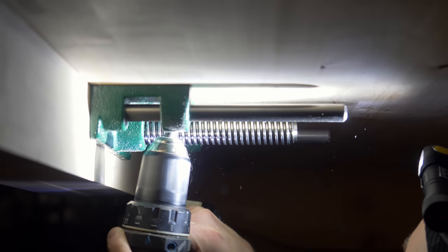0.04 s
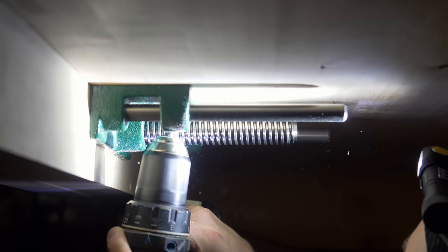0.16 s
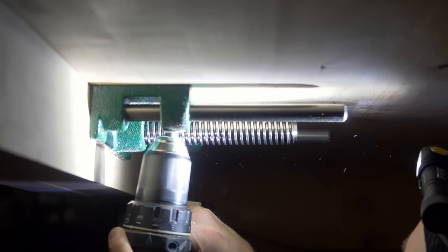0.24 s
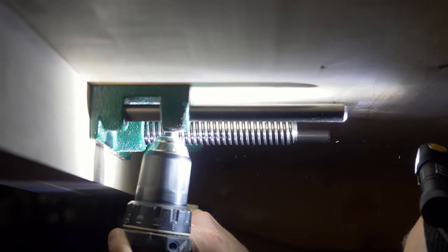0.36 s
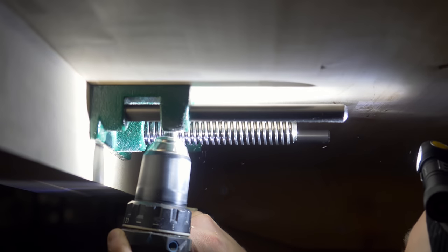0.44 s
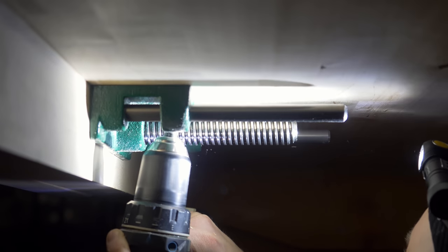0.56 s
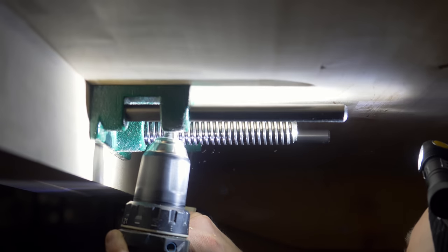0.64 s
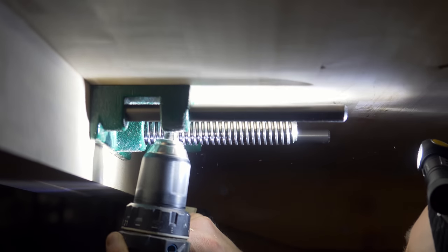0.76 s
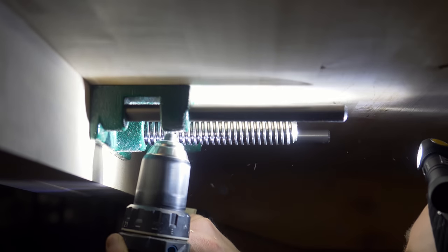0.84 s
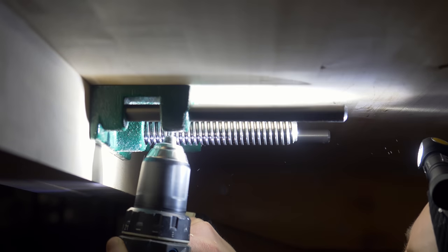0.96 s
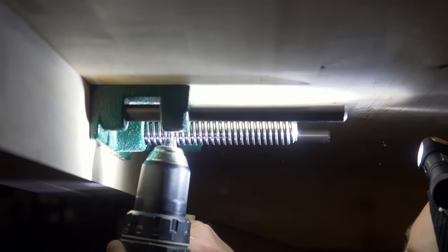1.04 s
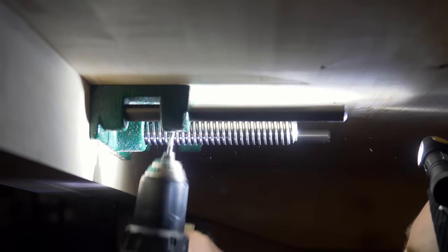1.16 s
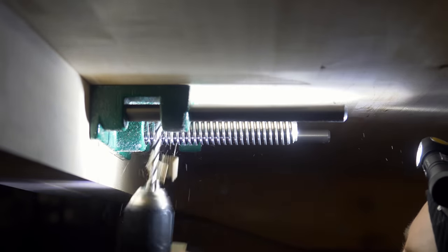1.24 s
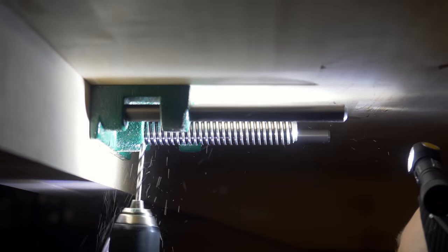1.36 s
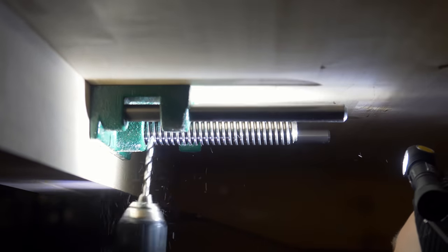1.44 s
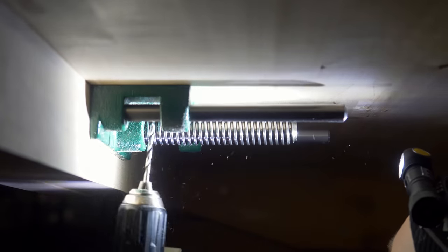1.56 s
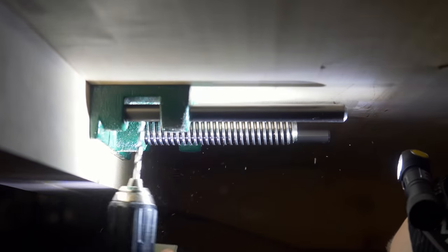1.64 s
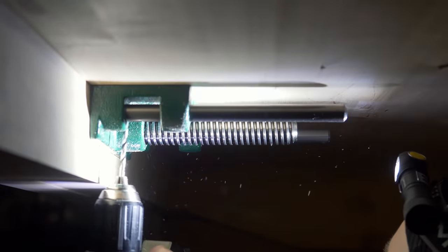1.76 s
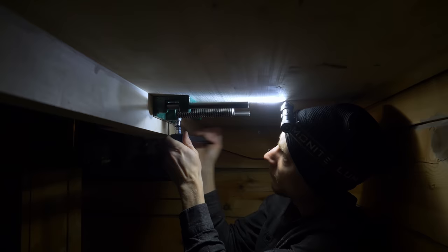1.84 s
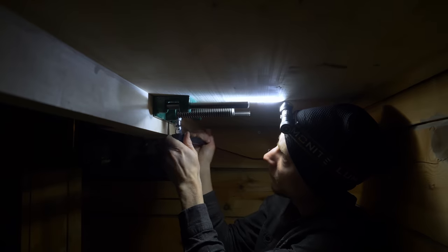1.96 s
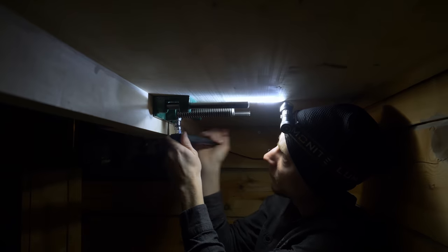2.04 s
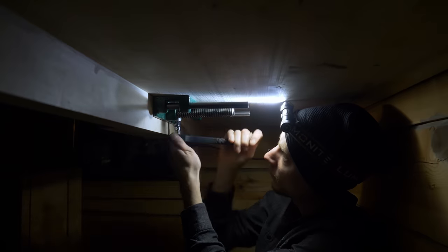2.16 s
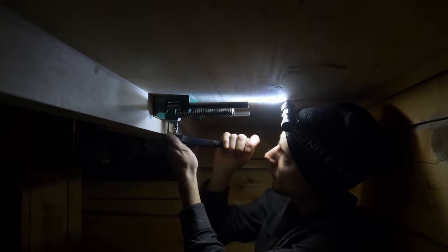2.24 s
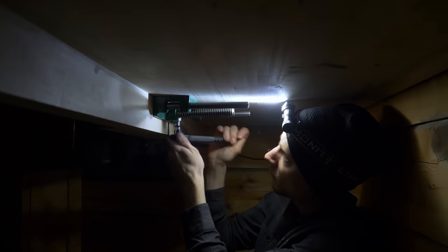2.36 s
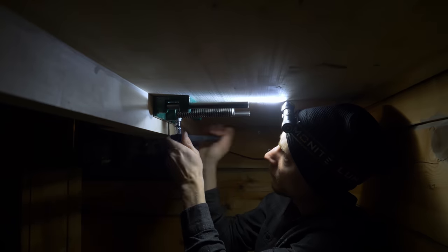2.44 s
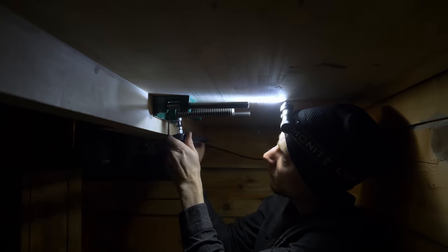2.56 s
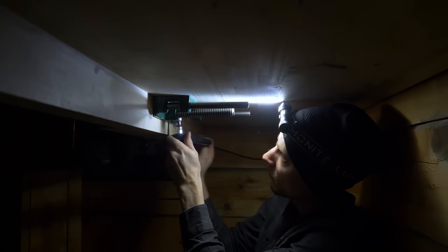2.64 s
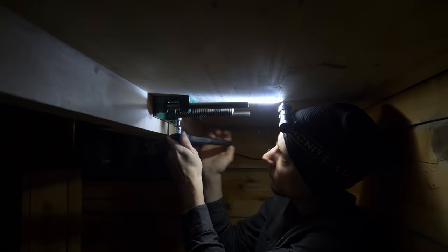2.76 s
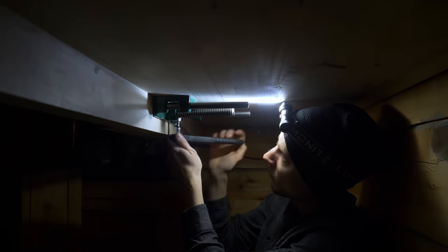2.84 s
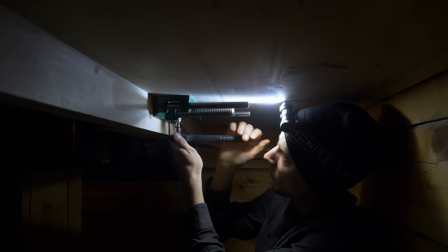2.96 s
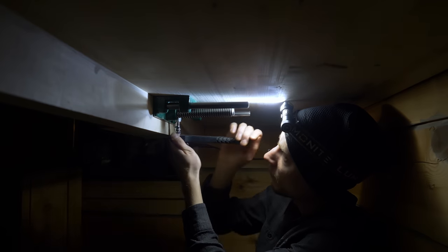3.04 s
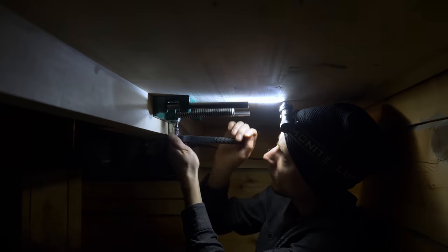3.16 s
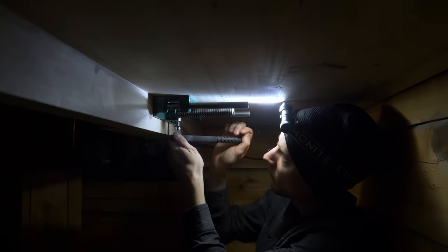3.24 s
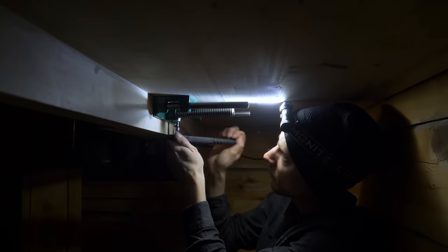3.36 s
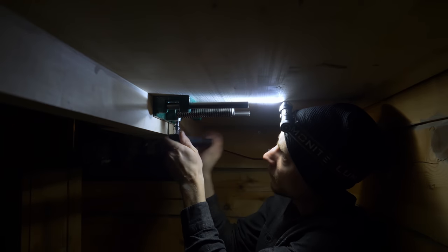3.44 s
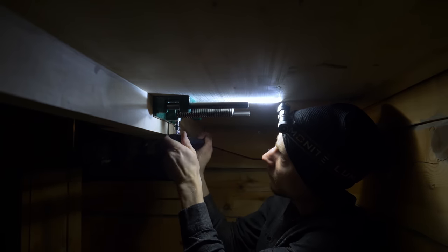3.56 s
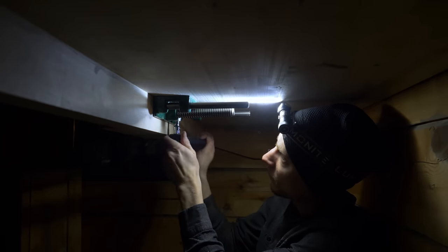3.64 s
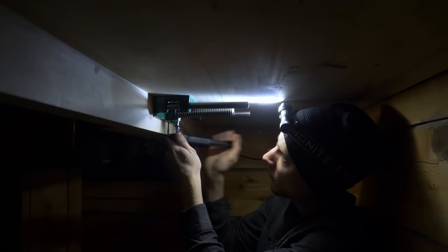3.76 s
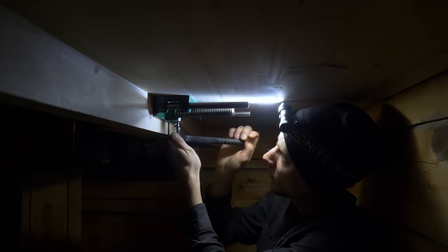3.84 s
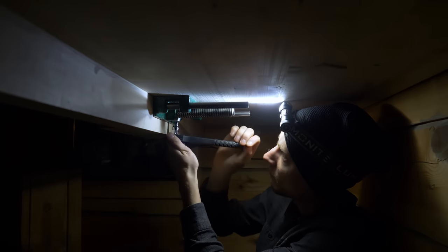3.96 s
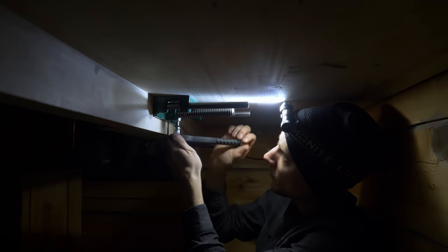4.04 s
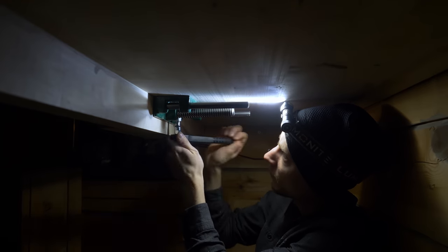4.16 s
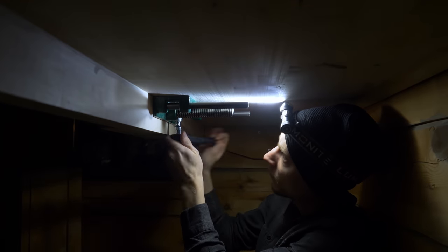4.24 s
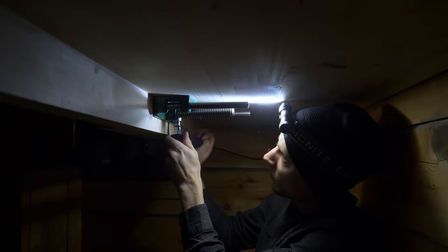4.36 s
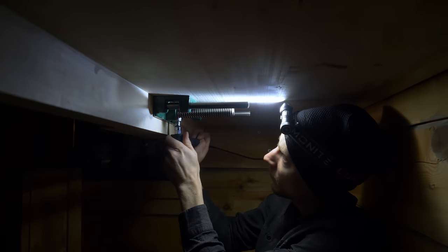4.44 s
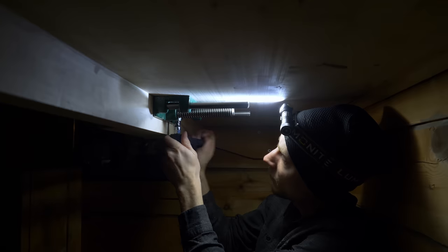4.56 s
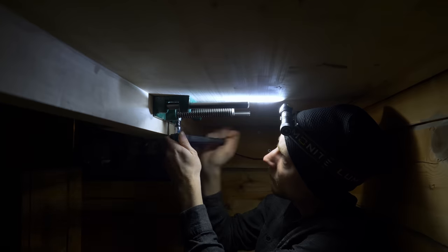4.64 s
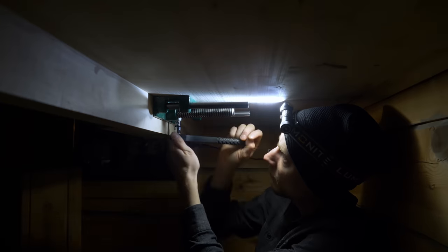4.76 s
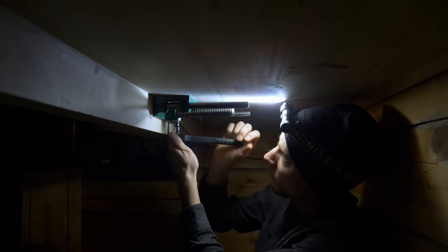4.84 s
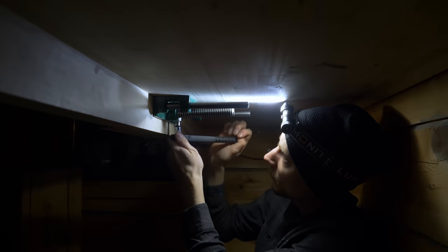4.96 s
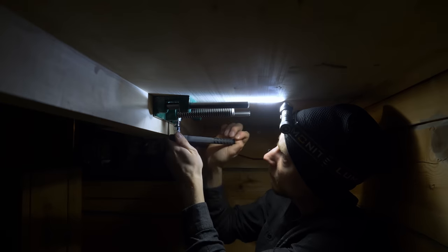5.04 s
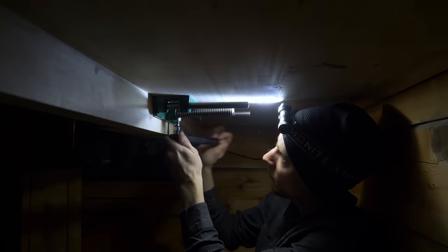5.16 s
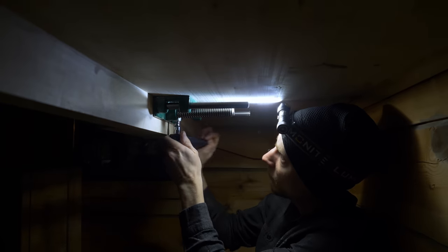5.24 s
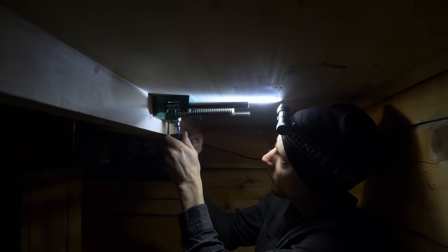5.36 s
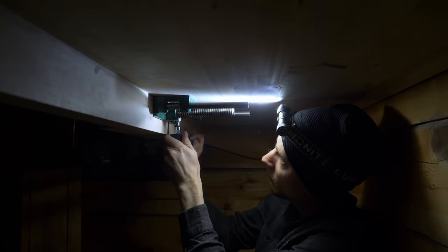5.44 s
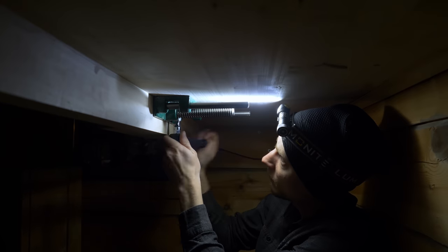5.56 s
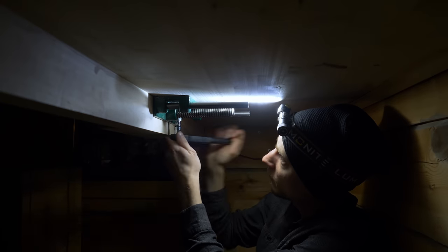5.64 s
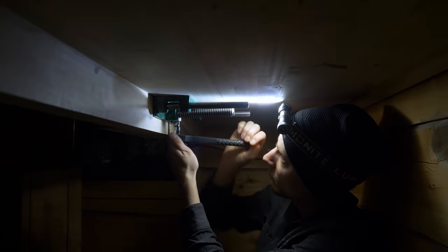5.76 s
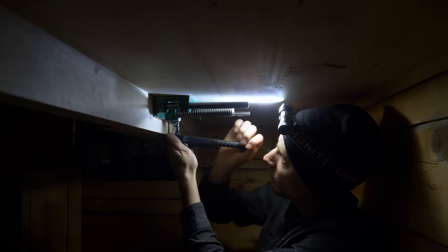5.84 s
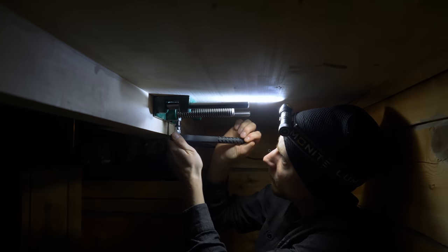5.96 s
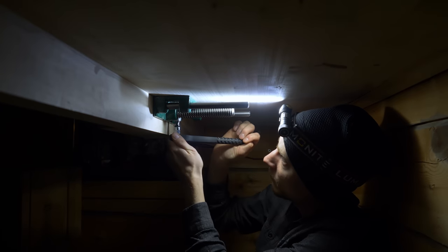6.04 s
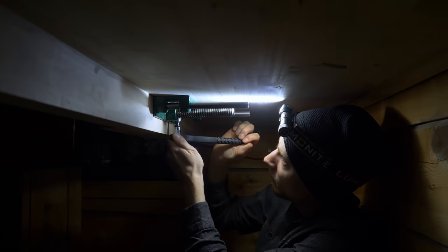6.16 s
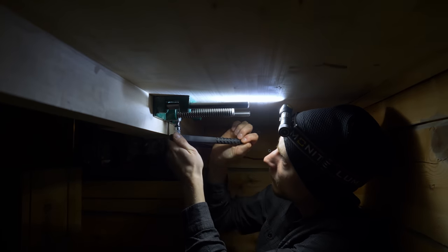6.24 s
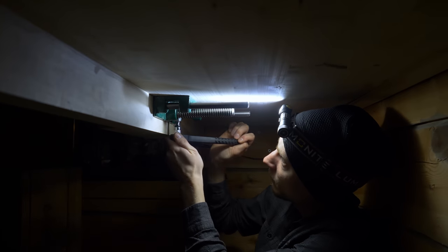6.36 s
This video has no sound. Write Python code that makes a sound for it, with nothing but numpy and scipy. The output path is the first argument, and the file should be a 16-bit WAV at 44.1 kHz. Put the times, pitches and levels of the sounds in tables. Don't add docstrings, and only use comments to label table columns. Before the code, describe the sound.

A drill motor whines under load, lifts to a freer, higher whine and cuts off sharply, its chuck ticking. After near quiet, hand and wrench bump a wooden bench; five back strokes each give six or seven crisp steel clicks, slowing towards the end. Knocks, low thuds and faint creaking fill the gaps. Heard close in stereo, in a small wooden workshop with a short reverberation and low room tone.

```python
import sys
import numpy as np
from scipy import signal
from scipy.fft import rfft, irfft
from scipy.io import wavfile
from scipy.ndimage import uniform_filter1d

SR = 44100
rng = np.random.default_rng(int(sys.argv[2]) if len(sys.argv) > 2 else 0)


def gain_from_db(level_db):
    decades = np.asarray(level_db, float) / 20
    return 10 ** decades


def put_to_file(sound):
    columns = np.atleast_2d(sound).T
    safe = np.clip(columns, -1, 1)
    whole_steps = np.round(safe * 32767)
    wavfile.write(sys.argv[1], SR, whole_steps.astype(np.int16))


N = 282240
TIME = np.arange(N) / SR
CHANGE_S = 1.88


def evened(x):
    return x / np.sqrt(np.mean(x ** 2) + 1e-20)


def peaked(x):
    return x / np.abs(x).max()


def read(points, hz):
    f, value = np.transpose(points)
    return np.interp(np.log(hz + 1), np.log(f + 1), value)


def add(mix, start_s, sound):
    part = mix[round(start_s * SR):][:len(sound)]
    part += sound[:len(part)]


def coloured(x, points):
    size = x.shape[-1]
    return evened(irfft(rfft(x) * gain_from_db(read(points, np.fft.rfftfreq(size, 1 / SR))), size))


def above(x, hz):
    return signal.sosfilt(signal.butter(4, hz, "high", fs=SR, output="sos"), x)


def drift(seconds):
    width = max(int(seconds * SR), 2)
    return evened(uniform_filter1d(uniform_filter1d(rng.standard_normal(N), width), width))


def somewhere(low_hz, high_hz):
    return low_hz * (high_hz / low_hz) ** rng.random()


def grit(spread_db, per_s):
    size = gain_from_db(spread_db * np.minimum(rng.exponential(1, N), 4))
    return rng.standard_normal(N) * size * (rng.random(N) < per_s / SR)


def rung(force, modes, weight_db=0):
    pitch_hz, level_db, t60_s = np.transpose(modes)
    t = np.arange(min(SR // 4, int(SR * t60_s.max())))[:, None] / SR
    decay = gain_from_db(level_db + weight_db - 60 * t / t60_s)
    ring = (decay * np.sin(2 * np.pi * pitch_hz * t)).sum(1)
    return evened(np.pad(signal.oaconvolve(force, ring), (0, SR // 4 - len(t))))


# pitch_hz, level_db
BAND_EDGE = [(15600, -75)]
# start_s, commutator pitch_hz
SPEED = [
    (0, 2562),
    (.3, 2568),
    (.7, 2608),
    (.8, 2690),
    (1.02, 2780),
    (1.06, 3030),
    (1.12, 3105),
    (1.2, 3170),
    (1.3, 3188),
]
# pitch_hz, level_db (per Hz)
CUTTING = [(53, -59.5), (90, -73), (241, -2.5), (293, -13.5), (500, 1), (569, -12), (704, -3), (2390, -7),
           (2660, -4), (3370, -2.5), (4950, -2), (6980, -9), (10500, -8.5), (15100, -26)]
# pitch_hz, level_db (per Hz)
FREE = [(53, -70.5), (90, -66), (195, -59), (312, -16.5), (412, -14), (972, -3), (2440, -6), (4850, -4),
        (5880, -6.5), (6270, -11), (6690, -7.5), (9840, -9.5), (15100, -24.5)]
WHIRR_DB = (-26, -27.5)
# pitch_hz, width_hz, level_db (re whirr)
HOUSING = [(1170.5, 24, -15), (1964, 72, -14.5), (3900, 130, -12.5), (4420, 78, -13), (4897, 90, -8)]
ORDERS = (1, 2, 4, 5, 11.255, 23, 40, 50)
ORDER_LOAD_HZ = (2580, 2640, 3150)
ORDER_DB = [(-46, -56, -44), (-44, -56, -47), (-52, -54, -45), (-54, -54, -47), (-42, -54, -47),
            (-42, -52, -40), (-43, -50, -62), (-58, -52, -90)]
PARTIAL_LOAD_HZ = (2565, 2588, 2740, 3050, 3170)
PARTIAL_DB = [
    (-56, -36, -38.5, -31, -39),
    (-39, -38, -34.5, -36, -32),
    (-46, -41, -47, -43, -42),
]
BARS = 10
LET_GO_S, SAG_HZ_PER_S = 1.43, 2600
GLIDE_LOSS_DB = 1.3


def drill():
    tone_hz = np.interp(TIME, *np.transpose(SPEED)) - SAG_HZ_PER_S * np.clip(TIME - LET_GO_S, 0, 1)
    top_hz = np.maximum.accumulate(tone_hz)
    free = np.clip((top_hz - 2780) / 280, 0, 1)
    turns = np.cumsum(tone_hz / BARS * (1 + 0.0008 * drift(0.0085))) / SR

    chatter = rng.standard_normal(N) + 0.27 * evened(grit(4.3, 2500))
    chatter *= gain_from_db(0.38 * drift(0.0033) + 0.68 * drift(0.027))
    in_wood = np.sqrt(1 - free) * coloured(chatter, CUTTING + BAND_EDGE)
    whirr = evened(in_wood + np.sqrt(free) * coloured(chatter, FREE + BAND_EDGE))
    for pitch_hz, width_hz, db in HOUSING:
        whirr = whirr + gain_from_db(db) * rung(rng.standard_normal(N), [(pitch_hz, 0, 2.2 / width_hz)])[:N]

    whine = np.zeros(N)
    for order, loads_db in zip(ORDERS, ORDER_DB):
        db = np.interp(top_hz, ORDER_LOAD_HZ, loads_db) + 3 * drift(.025)
        whine += np.sqrt(2) * gain_from_db(db) * np.sin(2 * np.pi * order * turns)
    for k, loads_db in enumerate(PARTIAL_DB):
        db = np.interp(top_hz, PARTIAL_LOAD_HZ, loads_db) + 3.5 * drift(.03)
        whine += np.sqrt(2) * gain_from_db(db) * np.sin(2 * np.pi * (k + 1) * BARS * turns)
    glide = uniform_filter1d(np.abs(np.gradient(tone_hz)) * SR / 1000, size=900)
    whine = whine * gain_from_db(-GLIDE_LOSS_DB * glide)

    braked = gain_from_db(-900 * np.maximum(TIME - 1.515, 0))
    fading = gain_from_db(-150 * np.maximum(TIME - 1.485, 0))
    whirr_db = np.interp(free, (0, 1), WHIRR_DB) - 0.33
    return above(gain_from_db(whirr_db) * whirr * braked, 130), whine * braked * fading


# pitch_hz, likeness (0 to 1)
LIKENESS = [(60, 1), (130, 1), (290, 1), (640, 1), (1410, 0.91), (3100, 0.92), (6820, 0.97), (15000, 0.96)]


def ports(z, hz, apart):
    likeness = np.clip(read(LIKENESS, hz), -1, 1)
    angle = np.clip(apart * np.arccos(likeness) / 2, 0, np.pi / 4)[:, None]
    return np.array([np.cos(angle) * z[0] + side * np.sin(angle) * z[1] for side in (1, -1)])


def air(points):
    noise = coloured(rng.standard_normal((2, N)), points + BAND_EDGE)
    hz, _, z = signal.stft(noise, SR, nperseg=1024)
    return evened(signal.istft(ports(z, hz, 3.7), SR, nperseg=1024)[1][:, :N])


# pitch_hz, level_db (per Hz)
BEAM_AIR = [(18, -56), (30, -26.5), (229, 0), (700, -4), (885, -13), (2710, -26), (3800, -6), (15100, -29)]
# pitch_hz, level_db (per Hz)
BENCH_AIR = [(18, -40), (30, -29.5), (126, -3.5), (186, -21.5), (229, -1), (296, -18.5), (526, -10.5),
             (647, -25.5), (737, -12.5), (840, -19), (1700, -30), (15100, -32)]


def room_tone():
    return np.where(TIME < CHANGE_S, gain_from_db(-68.5) * air(BEAM_AIR), gain_from_db(-62.5) * air(BENCH_AIR))


# pitch_hz, t60_s
SHOP = [(120, 0.18), (330, 0.36), (870, 0.22), (2300, 0.25), (6060, 0.19)]


def shop(x, stretch):
    taps = np.zeros((2, SR // 2))
    at = np.arange(200, SR // 2 - 20, 20) + rng.integers(0, 20, (2, (SR // 2 - 201) // 20))
    np.put_along_axis(taps, at, rng.choice([-1., 1.], at.shape), 1)
    hz, t, z = signal.stft(taps, SR, nperseg=256)
    z = z * gain_from_db(-60 * t / (stretch * read(SHOP, hz)[:, None]))
    tail = signal.istft(ports(z, hz, 3.38), SR, nperseg=256)[1]
    return signal.fftconvolve(x[None], tail / np.linalg.norm(tail[0]), axes=1)[:, :N]


# pitch_hz, level_db (re mid)
SIDE = [(200, -23), (700, -26), (1500, -19), (4000, -16), (9000, -17), (13000, -6)]


def shadowed(x):
    scatter = rng.standard_normal(2048) * np.exp(-np.arange(2048) / 300)
    side = signal.oaconvolve(x, scatter / np.linalg.norm(scatter))[:N]
    side = irfft(rfft(side) * gain_from_db(read(SIDE, np.fft.rfftfreq(N, 1 / SR))), N)
    return np.array([x + side, x - side])


# pitch_hz, level_db (per Hz)
PAWL = [(530, -8), (900, -14.5), (1190, -4.5), (1610, -10.5), (2530, -8), (3780, -3), (7040, -1),
        (7950, -3.5), (9780, 2), (14800, -14), (15900, -20), (16500, -41)]
# pitch_hz, level_db, t60_s
WRENCH = [(2290, -12, .05), (2560, -14, .05), (3650, -14, .04), (4500, -17, .03), (5350, -20, .025),
          (6850, -16, .03), (9750, -13, .09)]


def click(db, treble_db, ring_hz):
    t = np.arange(SR // 12) / SR
    shape = np.clip(t / 0.0012, 0, 1) * (gain_from_db(-26 * (t / 0.015) ** 3.16) + .08 * np.exp(-t / .028))
    rattle = rng.standard_normal(len(t)) * gain_from_db(4.52 * np.minimum(rng.exponential(1, len(t)), 3))
    tilt_db = 2.04 * (min(treble_db, 0) + 3.0)
    colour = [(100, -76.5)]
    for hz, level_db in PAWL:
        colour.append((hz, level_db + tilt_db * np.clip(np.log2(hz / 2000) / 2.36, 0, 1)))
    burst = np.pad(coloured(rattle, colour) * shape, (0, SR // 4 - 1))
    modes = WRENCH + [(ring_hz, 0, .018)]
    hz = np.transpose(modes)[0]
    weight_db = tilt_db * (hz > 4000) * (hz != ring_hz) + 3 * rng.standard_normal(len(hz))
    ring = rung(rattle * shape, modes, weight_db)
    return gain_from_db(db) * peaked(peaked(burst) + 0.19 * peaked(above(ring, 1100)))


# start_s, level_db (peak), treble_db (re peak)
TICKS = [(1.4882, -21, -19.5), (1.515, -30, 0), (1.5517, -19.5, -10), (1.675, -46, -17), (1.723, -46, -9),
         (1.7454, -45.5, -13), (1.8175, -50, -7), (1.836, -47.5, 0), (1.865, -54, -12), (1.8858, -42.5, -2),
         (1.9857, -51, -8), (2.0995, -36.5, -44), (2.111, -42.5, 0), (2.333, -53, -26),
         (2.3647, -29.5, -15.5), (2.564, -38.5, -1), (2.6056, -34.5, 0), (2.7298, -35, -15.5),
         (3.2493, -30, -10.5), (3.4815, -52, 0), (3.7634, -18.5, -16), (4.583, -53, -8),
         (4.967, -26.5, -17), (5.2285, -44, -11), (5.3896, -47, -31), (5.5262, -33.5, -45),
         (5.573, -48, -25), (5.661, -13, -4), (6.2266, -50, -6), (6.3232, -60, -16)]
# lowest pitch_hz, highest pitch_hz
TICK_RING_HZ = (2130, 4540)


def loose_ticks(steel):
    for start_s, db, treble_db in TICKS:
        add(steel, start_s - .002, click(db, treble_db, somewhere(*TICK_RING_HZ)))


def blow(length_s, spike=0., colour=((100, 0), (10000, 0)), rise_s=0.0017):
    t = np.arange(SR // 7) / SR
    shape = np.exp(-t / (length_s + 0.00042)) + spike * np.exp(-t / 0.002)
    return coloured(rng.standard_normal(len(t)), colour) * shape * np.clip(t / rise_s, 0, 1)


def wooden(x, low_hz):
    band_hz = [min(low_hz, 500), 1100]
    return signal.sosfilt(signal.butter(3, band_hz, "band", fs=SR, output="sos"), x)


# pitch_hz, level_db, t60_s
BENCH = [(254, -1, .09), (335, -5, 0.076), (392, -7, 0.061), (485, -3.5, 0.094), (544.7, 1.5, 0.063),
         (644, -6, 0.047), (694, -2.5, 0.11), (781, -28, 0.023)]
# pitch_hz, level_db (per Hz)
JAW = [(600, -27), (900, -12.5), (1200, -2), (1500, -12), (2200, -15.5), (3200, -26.5), (6000, -32),
       (14000, -59.5)]
SOFTNESS = .45


def knock(db, mode_hz, jaw_db, length_s):
    near_db = -9 * np.abs(np.log2(np.transpose(BENCH)[0] / mode_hz))
    force = blow(length_s, spike=1.5, rise_s=0.0027 * gain_from_db(-SOFTNESS * (db + 15)))
    ring = rung(force, BENCH + [(mode_hz, -4, .025)], np.append(near_db, 0))
    top = peaked(wooden(ring, 0.55 * mode_hz))
    clack = blow(1.27 * length_s + 0.0069, spike=1.75, colour=JAW)
    jaw = peaked(np.pad(clack, (0, SR // 4 - 1)))
    return gain_from_db(db) * (top + gain_from_db(jaw_db) * jaw)


# start_s, level_db (peak), loudest wood pitch_hz, vise clack level_db (re peak)
KNOCKS = [(1.88, -48, 250, 1), (1.948, -30, 560, -12), (2.072, -26.5, 550, -70), (2.284, -16.5, 574, -8),
          (2.35, -20.5, 543, -14.5), (2.39, -18.5, 640, -1), (2.568, -23.5, 585, -10),
          (2.607, -21, 510, -9), (2.739, -23.5, 520, -17), (3.004, -33, 694, -22), (3.17, -20, 300, -17.5),
          (3.271, -20, 545, -0.5), (3.381, -35, 543, 0), (3.514, -19.5, 740, 3.5),
          (3.686, -44.5, 248, -2.5), (3.762, -9, 428, -19), (4.054, -18, 542, 2), (4.6, -28.5, 549, -12.5),
          (4.64, -20.5, 500, -14.5), (4.886, -26.5, 580, -12), (4.947, -19, 704, -3), (5.02, -36, 496, -10),
          (5.185, -51, 199, -6), (5.231, -40, 226, -9), (5.345, -40.5, 468, -21.5), (5.499, -33, 870, -2.5),
          (5.596, -26.5, 694, -13.5), (5.622, -27, 543, -13), (5.662, -9.5, 566, -7.5),
          (5.968, -15, 640, -4)]


def bench_knocks(steel, wood):
    for start_s, db, mode_hz, jaw_db in KNOCKS:
        add(wood, start_s - .002, knock(db, mode_hz, jaw_db, length_s=0.017))
        add(steel, start_s, click(db + jaw_db - 3, treble_db=-14, ring_hz=2160))


# pitch_hz, level_db, t60_s
FRAME = [(75, -12, .25), (98, -7, .2), (120, -6, .12), (142, -3, .11), (165, -2, .11), (190, -1, .1),
         (236, 0, .1), (328, -2, .09)]


def thud(db, length_s):
    return gain_from_db(db) * peaked(above(rung(blow(length_s), FRAME), 110))


# start_s, level_db (peak), length_s
PUSHES = [(1.882, -43, 0.11), (2.313, -26, 0.046), (2.41, -30, 0.022), (2.61, -31, 0.026),
          (3.155, -25.5, 0.028), (3.25, -29.5, 0.054), (3.754, -29, 0.027), (4.057, -31.5, 0.051),
          (4.639, -30, 0.03), (4.968, -25, 0.037), (5.079, -46, 0.015), (5.339, -42, 0.02),
          (5.658, -26, 0.017), (5.959, -30, 0.061)]


def frame_pushes(wood):
    for start_s, db, length_s in PUSHES:
        add(wood, start_s, thud(db, length_s))


TEETH = [
    (2.1416, 2.1583, 2.1783, 2.1943, 2.214, 2.24),
    (2.818, 2.8556, 2.8929, 2.9268, 2.96, 3.0421, 3.1057),
    (3.8318, 3.858, 3.8792, 3.908, 3.9486, 4.004),
    (4.7138, 4.7407, 4.7615, 4.783, 4.8128, 4.8602),
    (5.707, 5.7251, 5.7474, 5.7691, 5.799, 5.8319, 5.8903),
]
RISE_DB_PER_S, GRIP_DB = 292, -59
GROAN_FALL_DB_PER_S, SCUFF_FALL_DB_PER_S = 107, 58.5


def load(tops_db, fall_db_per_s):
    level_db = np.full(N, float(GRIP_DB))
    for teeth, top_db in zip(TEETH, tops_db):
        before_db = RISE_DB_PER_S * np.maximum(teeth[0] - TIME, 0)
        after_db = fall_db_per_s * np.maximum(TIME - teeth[-1], 0)
        level_db = np.maximum(level_db, top_db - before_db - after_db)
    return level_db


# tooth knock level_db, groan level_db, scuff level_db
STROKES = [
    (-22, -44, -32),
    (-20, -36, -43),
    (-22.5, -27.5, -48),
    (-21.5, -30, -47.5),
    (-25, -30, -55),
]


def strain():
    _, groan_db, scuff_db = np.transpose(STROKES)
    slips, rubs = grit(3, 600), grit(2.5, 6000)
    groan = wooden(rung(slips, BENCH)[:N], 320) + 0.75 * coloured(rubs, JAW)
    scuff = coloured(rubs, [(800, -24.0), (1500, 0.5), (5000, 1), (10000, 0.0), (15500, -28.0), (16500, -71.0)])
    groan = gain_from_db(load(groan_db, GROAN_FALL_DB_PER_S) - 13.5) * groan
    scuff = gain_from_db(load(scuff_db, SCUFF_FALL_DB_PER_S) - 15.5) * scuff
    return (groan + scuff) * (TIME > CHANGE_S)


# lowest pitch_hz, highest pitch_hz
TOOTH_RING_HZ = (2320, 10560)
TOOTH_DB, FIRST_TOOTH_DB, TOOTH_SPREAD_DB = -11, -2, .8
TOOTH_FADE_DB_PER_S = 29.5


def back_strokes(steel, wood):
    for teeth, (knock_db, *_) in zip(TEETH, STROKES):
        for s in teeth:
            luck = rng.standard_normal(2)
            click_db = TOOTH_DB + FIRST_TOOTH_DB * (s == teeth[0]) + TOOTH_SPREAD_DB * luck[0]
            add(steel, s - .002, click(click_db, -5.5, somewhere(*TOOTH_RING_HZ)))
            shake_db = knock_db - TOOTH_FADE_DB_PER_S * (s - teeth[0]) + 2 * luck[1]
            add(wood, s - .004, knock(shake_db, mode_hz=545, jaw_db=-20.5, length_s=0.0097))


def scene():
    whirr, whine = drill()
    steel, wood = np.zeros(N), strain()
    loose_ticks(steel)
    bench_knocks(steel, wood)
    frame_pushes(wood)
    back_strokes(steel, wood)
    work = gain_from_db(-7.0) * steel + gain_from_db(-6.0) * wood
    swing = 2 * np.pi * 7 * TIME
    wet = shop(work * np.cos(swing), 0.91) + shop(work * np.sin(swing), 0.72)
    wet = wet + shop(gain_from_db(-7.5) * above(whirr + 0.74 * whine, 546), 1.47)
    close = gain_from_db(-1.5) * whirr + whine + gain_from_db(1.45) * steel + gain_from_db(-2.5) * wood
    return shadowed(close) + wet + room_tone()


def below(x, hz):
    return irfft(rfft(x) * np.clip((hz - np.fft.rfftfreq(N, 1 / SR)) / 200 + .5, 0, 1), N)


def top_cut(x):
    return signal.sosfilt(signal.butter(12, 16660, fs=SR, output="sos"), x)


def record(dry):
    mix = np.where(TIME < 1.53, below(dry, 15250), below(dry, 15900))
    return top_cut(mix)


dry = scene()
out = record(dry)
put_to_file(out)
```